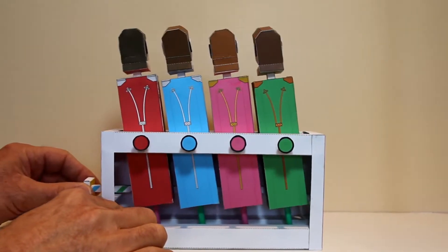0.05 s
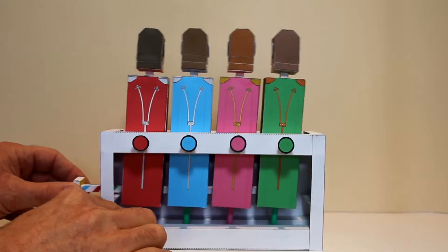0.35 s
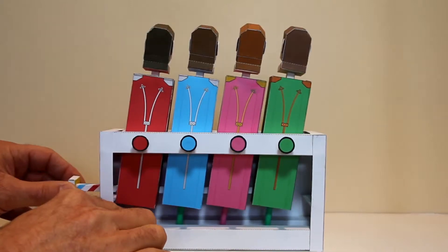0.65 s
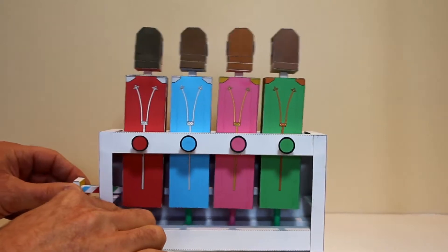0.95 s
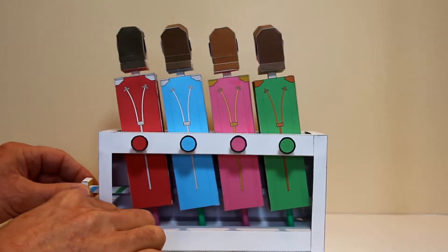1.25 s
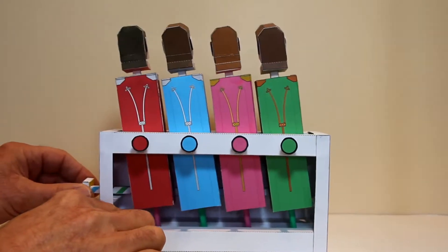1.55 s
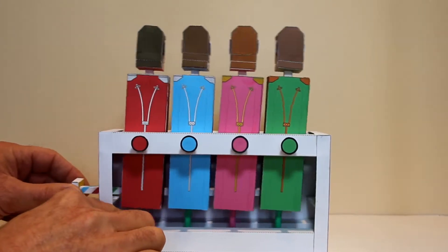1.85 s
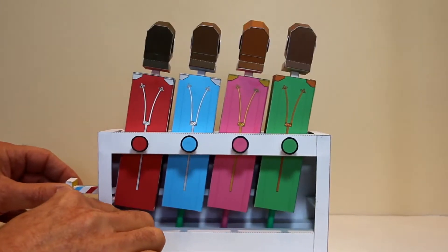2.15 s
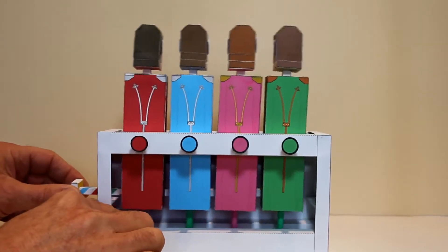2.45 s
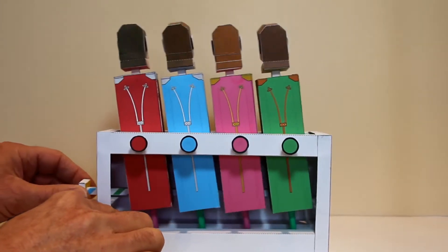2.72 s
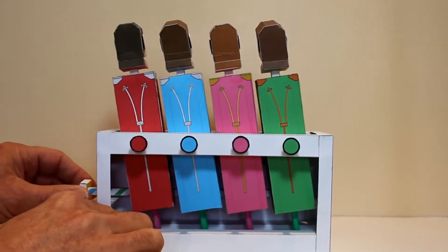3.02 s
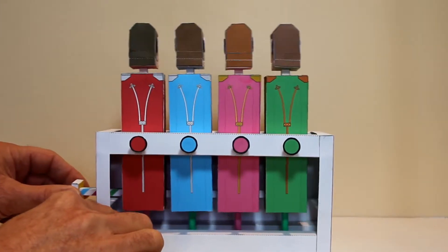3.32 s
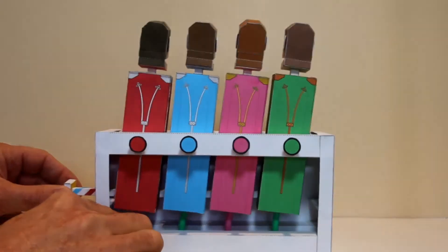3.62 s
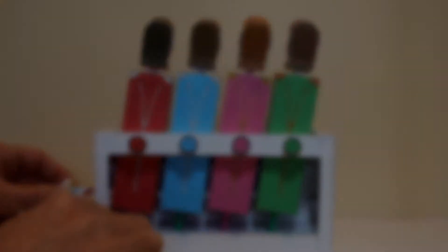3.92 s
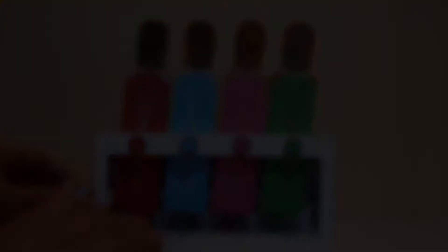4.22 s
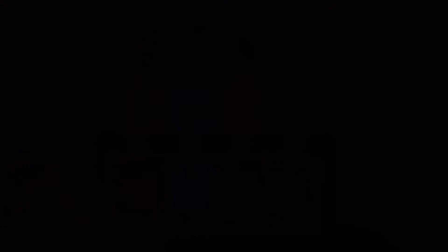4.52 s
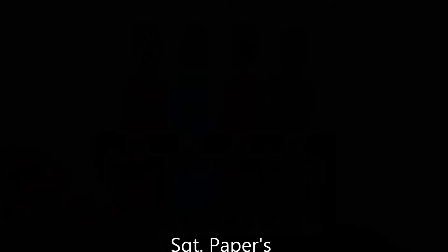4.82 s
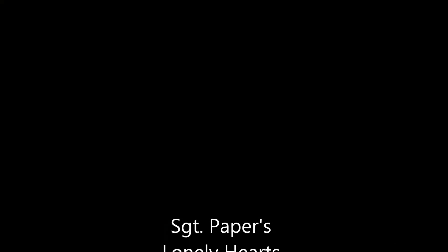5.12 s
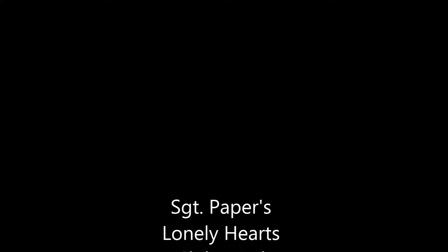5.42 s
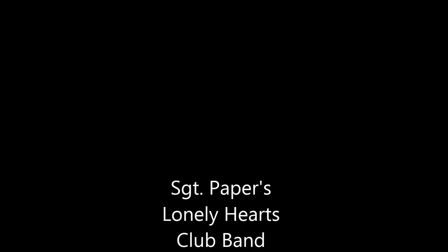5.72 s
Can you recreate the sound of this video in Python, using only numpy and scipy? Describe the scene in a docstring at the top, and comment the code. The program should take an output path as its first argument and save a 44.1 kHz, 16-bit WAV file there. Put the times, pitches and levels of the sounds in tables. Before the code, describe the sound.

A hand-cranked paper toy rubs, scrapes and clicks in repeated swings over a soft fan-like hum in a quiet room.

```python
"""A soft fan-like rush, a thin whine and a faint low drone fill a quiet room. At once a hand cranks a
paper automaton: four card figures rock to and fro, cams and sliders rub, and the hollow card frame rings
with every slip and click. Followers bump on their cams and the crank squeaks in its bearing. Near 1.7 s
an edge binds in a long scrape as the drone swells; the drone climbs until 3 s, then sinks. A last flurry
of clicks and scrapes comes at 4.3-4.7 s, and all stops just after 5.1 s as a new swing begins."""
import sys
import numpy as np
from scipy import signal
from scipy.fft import rfft, irfft
from scipy.io import wavfile

SR = 44100
rng = np.random.default_rng(int(sys.argv[2]) if len(sys.argv) > 2 else 0)


def pcm_store(signal):
    """Save signal as 16-bit PCM."""
    levels = np.round(np.clip(np.atleast_2d(signal), -1, 1) * 32767)
    wavfile.write(sys.argv[1], SR, levels.astype(np.int16).T)


N = 254016
TIME = np.arange(N) / SR

# tone curve of the room air: frequency_hz, relative_db
AIR_SPECTRUM = [(20, -46.5), (36, -25), (60, -14), (100, -17), (200, -9), (520, -14.5), (610, -15.5),
                (920, 1), (1150, -7), (1530, -16.5), (1900, -13.5), (2500, -23), (4100, -24), (6000, -31),
                (15500, -40)]
# partials of the whine: pitch_hz, base_level_db
WHINE_PARTIALS = [(2828, -67.5), (3179.5, -58.5)]
# slow level ride on the whine: time_s, gain_db
WHINE_RIDE = [(0, -1.5), (.85, 2.5), (1.3, -.5), (2.25, 1.5), (3.05, -2), (3.8, -1), (4.15, 2), (5.1, 0.5)]
# glide of the low drone: time_s, pitch_hz
DRONE_GLIDE = [(0, 56.3), (1.0, 69), (1.83, 89), (3.05, 109.8), (4.6, 97.9), (4.8, 71.9), (5.1, 65)]
# swells on top of the drone: peak_s, level_db
DRONE_SWELLS = [(1.2, -61), (1.46, -57), (1.83, -55)]
# the crank squeaks in its bearing: peak_s, level_db, half_length_s
BEARING_SQUEAKS = [(0.645, -44, 0.0087), (.681, -39, 0.0056), (0.731, -50, 0.0096), (1.301, -34.5, 0.0062),
                   (2.849, -38.5, 0.008), (3.839, -44, 0.01), (3.912, -49.5, 0.01)]
# a follower drops softly on its cam: peak_s, level_db, pitch_hz
CAM_BUMPS = [(0.196, -34.5, 484), (.314, -34, 460), (1.063, -30.5, 467), (1.81, -33, 405),
             (2.685, -32, 434), (3.323, -47, 465), (3.802, -40, 340), (4.587, -38, 413)]
# a card edge catches and lets go: start_s, snap_db, push_db
EDGE_CLICKS = [(.1505, 14, 20), (0.3832, 3, 12), (0.4037, 9, 19), (1.008, -2, 13), (1.066, 1, 17),
               (1.21, -0.5, 3), (1.6388, 3, 15), (1.662, 19.5, -1), (1.948, -4, 17), (2.007, 4, 15),
               (2.2356, -3.5, 12), (2.5053, 7, 11), (3.1482, 10, 11.5), (3.1888, 15, 7), (3.317, -9, 17),
               (3.9128, 2, -2), (4.0041, 9.5, 17), (4.0585, 4, 16.5), (4.2646, -1, 4), (4.338, 5, 19),
               (4.3564, 14.5, 25), (4.5525, 5, 18), (4.6902, 7, 19.5)]
# a card edge binds and scrapes along: start_s, length_s, level_db, relative_grit_db
EDGE_SCRAPES = [(0.14, 0.021, -6, -2), (0.373, 0.071, -13, -6), (.665, 0.014, -14, -9),
                (0.999, 0.071, -7.5, -7), (1.081, 0.039, -13, -9), (1.18, 0.16, -21, -4.5),
                (1.44, 0.027, -20.5, -10.5), (1.643, .078, -5.5, -1.5), (1.729, 0.34, -13, -7.5),
                (2.494, 0.047, -9, -11.5), (2.92, .11, -33.5, 4), (3.143, .03, -15.5, -4.5),
                (3.184, 0.06, -7, -2.5), (3.254, 0.061, -12, -6.5), (3.382, 0.13, -15, -7.5),
                (4.266, 0.12, -12, -9.5), (4.408, 0.091, -14.5, -9), (4.485, 0.14, -9.5, -8),
                (4.623, 0.087, -11, -3.5)]
# each half turn of the crank swings the figures across: start_s, length_s, level_db, relative_grit_db
FIGURE_SWINGS = [(.115, 0.62, -15, -12.5), (.87, 0.62, -16, -11), (1.585, 0.56, -15, -7.5),
                 (2.38, 0.52, -14.5, -8), (3.1, 0.79, -14.5, -12.5), (4.18, 0.64, -14.5, -13.5),
                 (5.08, 0.08, -19.5, -20)]
# resonances of the hollow card frame: pitch_hz, width_hz, gain_db
FRAME_MODES = [(326, 70, -31), (483, 23, -14), (509.2, 75, -11), (764, 49, -5), (856.5, 65.5, -6),
               (922, 17, -16.5), (1253, 62, -16), (1419, 98, -20.5), (1584, 92, -13), (1830, 91, -18),
               (1936, 57, -19), (2342, 75, -20), (2471, 94, -14), (2741, 84, -18.5), (3022, 150, -13),
               (3127, 35, -15.5), (3635, 57, -17), (3860, 60, -16.5), (4300, 124.5, -24),
               (4700, 150, -29.5), (5140, 260, -33), (6700, 360, -41.5), (7250, 490, -39), (8130, 300, -32),
               (10180, 300, -46.5)]


def from_db(db):
    """Decibels to gain."""
    return 10 ** (np.asarray(db) / 20)


def rms_one(x):
    """Scale to rms 1."""
    return x / np.sqrt(np.mean(x ** 2) + 1e-20)


def curve(points):
    """Straight ramps between (time, value) points."""
    return np.interp(TIME, *np.transpose(points))


def sine(hz):
    """A sine that follows a moving pitch."""
    return np.sin(2 * np.pi * np.cumsum(hz) / SR)


def cut(x, hz, kind, order=2):
    """Butterworth low- or high-pass."""
    return signal.sosfilt(signal.butter(order, hz, kind, fs=SR, output="sos"), x + 1e-18)


def resonate(x, hz, width_hz):
    """One resonance with unity gain at its peak."""
    radius = np.exp(-np.pi * width_hz / SR)
    feedback = [1, -2 * radius * np.cos(2 * np.pi * hz / SR), radius ** 2]
    return signal.lfilter(np.array([1, 0, -1]) * (1 - radius ** 2) / 2, feedback, x + 1e-18)


def drift(rate_hz):
    """Smooth random modulation, rms 1."""
    return rms_one(cut(rng.standard_normal(N + SR), rate_hz, "low")[SR:])


def air(level_db=-46.5):
    """Room air: a steady, fan-like bed of shaped noise."""
    hz, db = np.transpose(AIR_SPECTRUM)
    bins_hz = np.arange(N // 2 + 1) * SR / N
    colour = from_db(np.interp(np.log(bins_hz + 1), np.log(hz), db))
    return from_db(level_db) * rms_one(irfft(rfft(rng.standard_normal(N)) * colour, N))


def whine(waver_hz=2.0, flutter_db=0.6):
    """Two thin, slightly wavering tones that slowly swell and sink."""
    ride_db = curve(WHINE_RIDE)
    tones = sum(from_db(db + ride_db + flutter_db * drift(15)) * sine(hz + waver_hz * drift(30))
                for hz, db in WHINE_PARTIALS)
    return np.sqrt(2) * tones


def drone(floor_db=-68, swell_s=0.081):
    """A faint low tone glides up and back down, swelling three times on the way up."""
    swells = sum(from_db(db) * np.exp(-((TIME - peak_s) / swell_s) ** 2) for peak_s, db in DRONE_SWELLS)
    return np.sqrt(2) * (from_db(floor_db) + swells) * sine(curve(DRONE_GLIDE))


def room(x, wall_s=0.0094, wall_db=-14, t60_s=0.27, tail_db=-16, tail_hz=6000):
    """One reflection off the wall just behind, then a short dull tail."""
    age = TIME[:SR // 3]
    tail = cut(rng.standard_normal(len(age)), tail_hz, "low")
    tail *= from_db(-60 * age / t60_s) * (age > wall_s)
    reverb = signal.fftconvolve(x, tail / np.linalg.norm(tail))[:N]
    echo = np.interp(TIME - wall_s, TIME, x, left=0)
    return x + from_db(wall_db) * echo + from_db(tail_db) * reverb


def bearing_squeaks(upper_hz=2760, lower_hz=2450, wobble_hz=110, lower_db=-4, rough_db=4.0):
    """Brief, unsteady chirps on two close resonances of the crank bearing."""
    grip = sum(from_db(db) * np.exp(-np.abs((TIME - peak_s) / half_length_s) ** 1.9)
               for peak_s, db, half_length_s in BEARING_SQUEAKS)
    upper, lower = (sine(hz + wobble_hz * drift(297)) for hz in (upper_hz, lower_hz))
    roughness = from_db(rough_db * drift(210))
    return grip * rms_one((upper + from_db(lower_db) * lower) * roughness)


def cam_bumps(decay_s=0.0032):
    """A follower lands softly: the bump swells and dies within a few cycles of the hollow box."""
    bumps = np.zeros(N)
    for peak_s, db, hz in CAM_BUMPS:
        age = TIME - peak_s
        envelope = from_db(db) / np.cosh(np.clip(age / decay_s, -20, 20))
        bumps += envelope * np.sin(2 * np.pi * hz * age)
    return bumps


def bending(force, travel_s=0.00243, at_hz=800, top_hz=14000):
    """Higher bending waves run faster, so the treble of a hit arrives first and the body last."""
    hz = np.arange(N // 2 + 1) * SR / N
    lag_cycles = travel_s * (2 * np.sqrt(at_hz * hz) - hz * np.sqrt(at_hz / top_hz))
    return irfft(rfft(force) * np.exp(-2j * np.pi * lag_cycles), N)


def edge_clicks(crack_db=-4, snap_s=0.0029, snap_hz=3000, push_hz=2000, ring_hz=8200, ring_db=1):
    """A caught edge lets go with a crack and a brief ringing snap, and gives the frame a push."""
    snap, push = np.zeros(N), np.zeros(N)
    age = TIME[:SR // 50]
    for start_s, snap_db, push_db in EDGE_CLICKS:
        at = round(start_s * SR)
        burst = rng.standard_normal(len(age)) * np.exp(-age / snap_s)
        snap[at] += from_db(snap_db + crack_db)
        snap[at:at + len(age)] += from_db(snap_db) * burst / np.linalg.norm(burst)
        push[at] -= from_db(push_db)
    snap = cut(snap, snap_hz, "high") + from_db(ring_db) * resonate(snap, ring_hz, width_hz=1400)
    push = cut(cut(push, push_hz, "low"), 520, "high")  # a light hit carries little bass
    return bending(snap + push)


def strokes(rows, attack_s, sag_db, release_s):
    """Force and grit envelopes of a run of strokes: each builds, eases off and dies away."""
    power, grit_power = np.zeros(N), np.zeros(N)
    for start_s, length_s, db, grit_db in rows:
        age = TIME - start_s
        held = np.clip(age / attack_s, 0, 1) * from_db(db - sag_db * np.clip(age / length_s, 0, 1))
        force = held * np.exp(-np.clip((age - length_s) / release_s, 0, 30))
        power += force ** 2
        grit_power += (force * from_db(grit_db)) ** 2
    return np.sqrt(power), np.sqrt(grit_power)


def pressures(face_drag_db=-7.5, edge_touch_db=-4.5, axle_scrape_db=-48.5, axle_grit_db=-45):
    """Slide, scrape and grit envelopes: swings, binding edges and the ever-rubbing axle add in power."""
    swing, swing_grit = strokes(FIGURE_SWINGS, attack_s=0.066, sag_db=6, release_s=0.043)
    bind, bind_grit = strokes(EDGE_SCRAPES, attack_s=0.012, sag_db=0.5, release_s=0.015)
    sliding = np.hypot(swing, from_db(face_drag_db) * bind)
    scraping = np.hypot(np.hypot(bind, from_db(edge_touch_db) * swing), from_db(axle_scrape_db))
    grating = np.hypot(np.hypot(bind_grit, swing_grit), from_db(axle_grit_db))
    return sliding, scraping, grating


def fibre_slips(per_s, spread_db):
    """Paper grain: tiny slips of fibres at random moments, a few much louder than the rest."""
    sizes = from_db(spread_db * np.minimum(rng.exponential(1, N), 3.5)) * rng.choice([-1, 1], N)
    return rms_one(sizes * (rng.random(N) < per_s / SR))


def judder(per_s=65, relax_s=0.0091, steady_share=0.45):
    """Stick-slip: the level jumps at each release and then relaxes."""
    releases = (rng.random(N) < per_s / SR) * rng.uniform(0.51, 1, N)
    power = signal.lfilter([1], [1, -np.exp(-1 / (relax_s * SR))], releases + 1e-18)
    return np.sqrt(steady_share + (1 - steady_share) * power / power.mean())


def rocking(hiss, turn_s=1.46, path_s=0.00055, swing_s=0.00028, reflect_db=-11):
    """The figures rock once a crank turn, so their moving reflection gently flanges the hiss."""
    delay_s = path_s + swing_s * np.cos(2 * np.pi * TIME / turn_s)
    return hiss + from_db(reflect_db) * np.interp(TIME - delay_s, TIME, hiss)


def friction(slide_hz=620, grit_hz=2500, low_cut_hz=230):
    """Cams and sliders rub on card: faces slide softly, edges scrape and grate, all in one judder."""
    sliding, scraping, grating = pressures()
    edge = fibre_slips(per_s=4000, spread_db=2.5)
    face = fibre_slips(per_s=2500, spread_db=3.5)
    face = cut(face, low_cut_hz, "high")  # light card radiates little bass
    slide = cut(face, slide_hz, "low", order=4) * sliding
    scrape = cut(cut(edge, slide_hz, "high", order=4), grit_hz, "low", order=3) * scraping
    grit = rocking(cut(edge, grit_hz, "high", order=3)) * grating
    return (slide + scrape + grit) * judder()


def card_frame(force, top_hz=11800):
    """The hollow frame rings in all its modes at once; the fibres damp the top end."""
    ringing = sum(from_db(db) * resonate(force, hz, width_hz) for hz, width_hz, db in FRAME_MODES)
    return cut(ringing, top_hz, "low")


def scene():
    """The automaton in its room, over a bed of air, whine and drone; mono."""
    automaton = card_frame(friction() + edge_clicks()) + cam_bumps() + bearing_squeaks()
    return (room(automaton) + air() + whine() + drone())[None]


def record(dry):
    """A fast fade to silence shortly before the end, and a steep high cut."""
    fade_start_s, fade_s, high_cut_hz = 5.141, 0.004, 15750
    fade = np.exp(-np.clip((TIME - fade_start_s) / fade_s, 0, 20))
    return signal.sosfilt(signal.ellip(10, .1, 80, high_cut_hz, fs=SR, output="sos"), dry * fade)


dry = scene()
out = record(dry)
pcm_store(out)
```